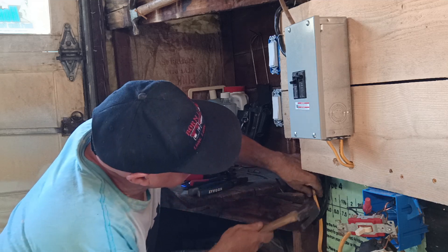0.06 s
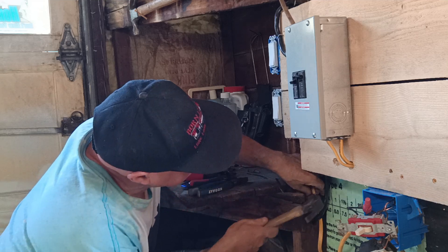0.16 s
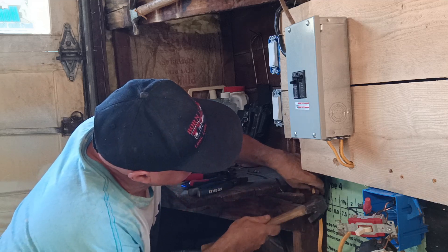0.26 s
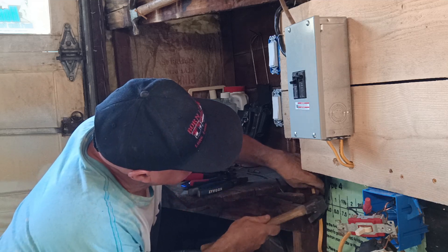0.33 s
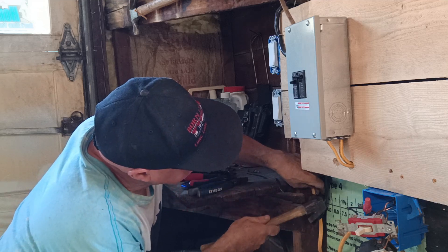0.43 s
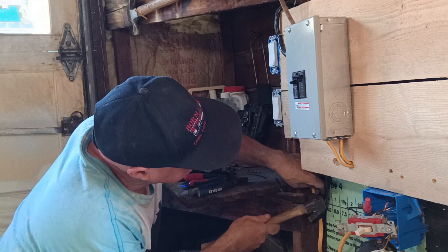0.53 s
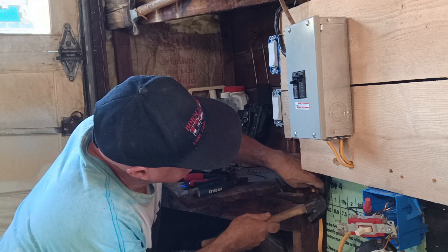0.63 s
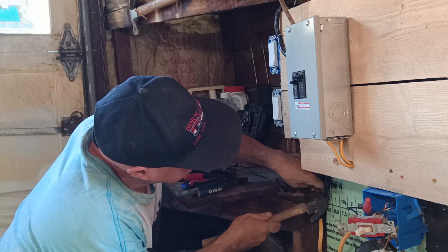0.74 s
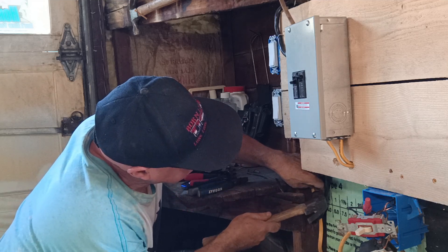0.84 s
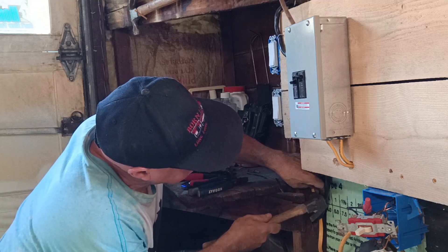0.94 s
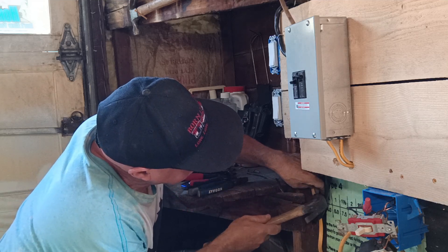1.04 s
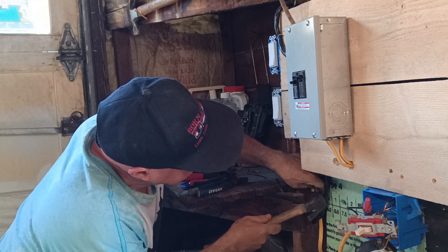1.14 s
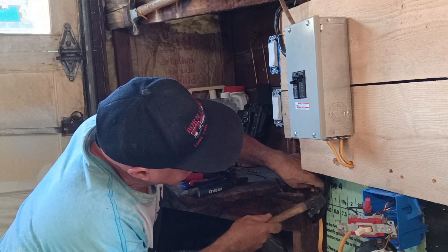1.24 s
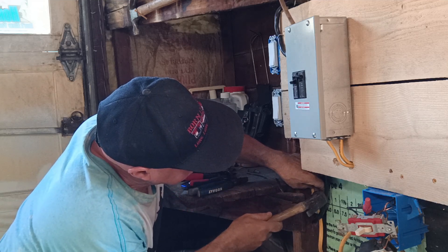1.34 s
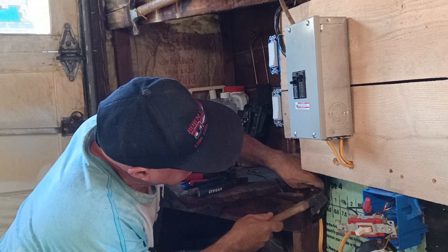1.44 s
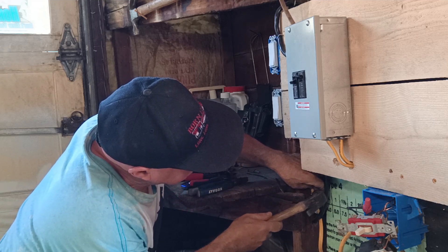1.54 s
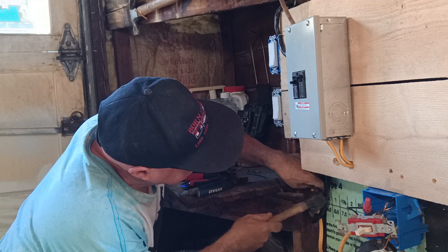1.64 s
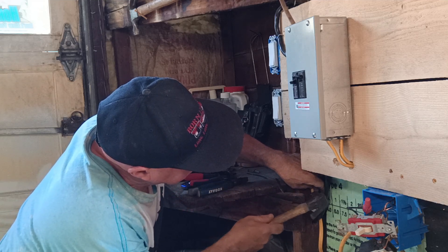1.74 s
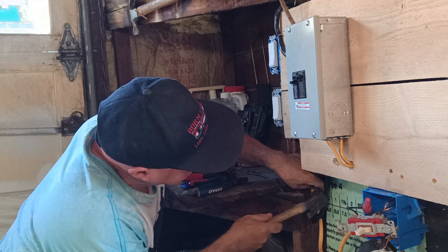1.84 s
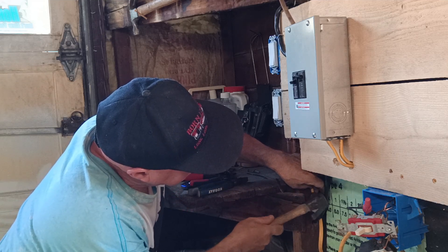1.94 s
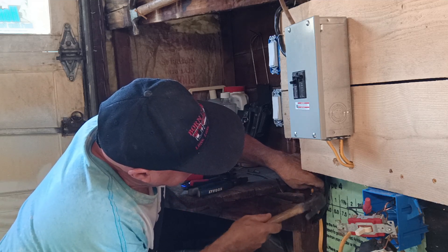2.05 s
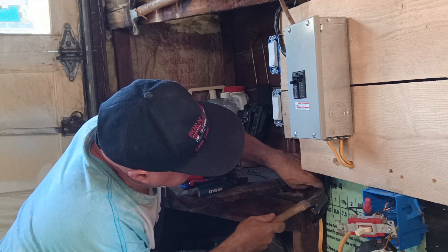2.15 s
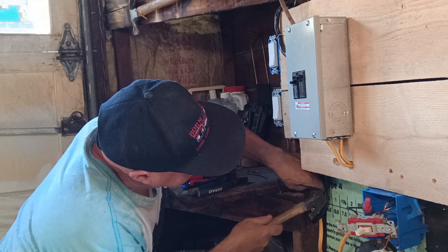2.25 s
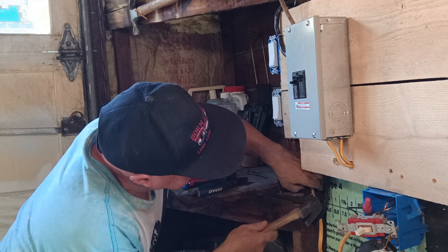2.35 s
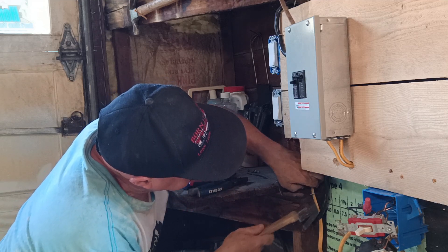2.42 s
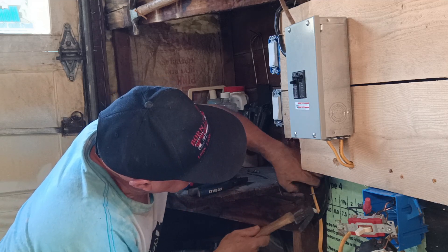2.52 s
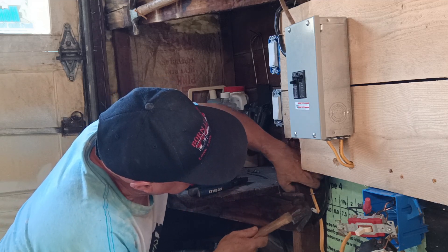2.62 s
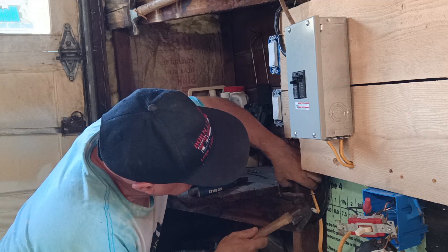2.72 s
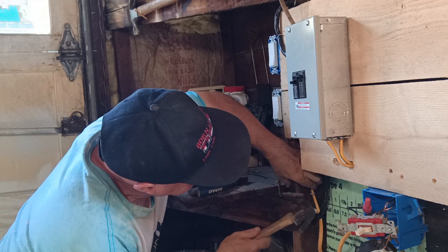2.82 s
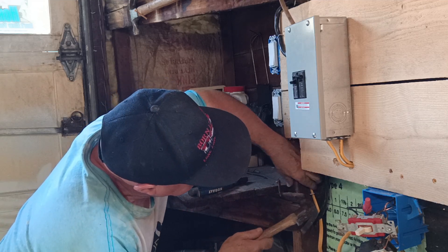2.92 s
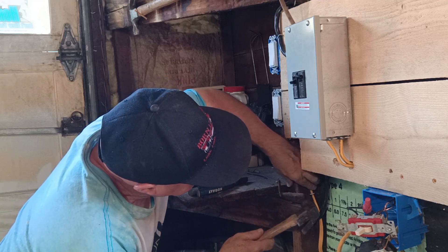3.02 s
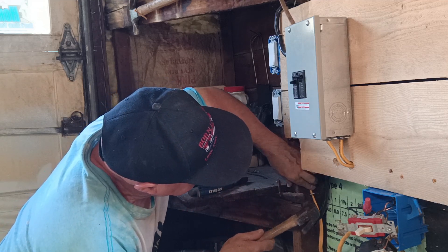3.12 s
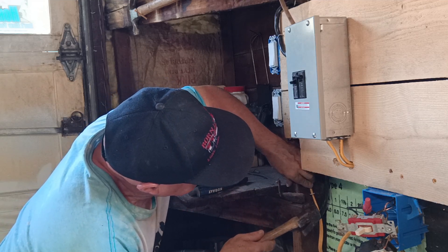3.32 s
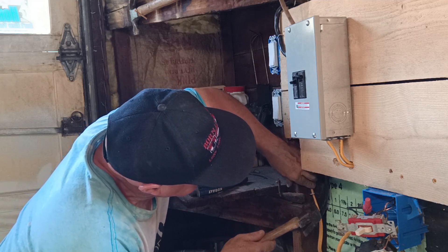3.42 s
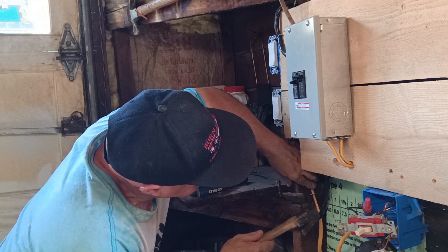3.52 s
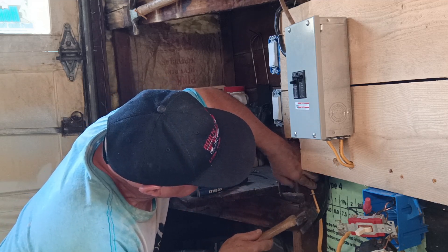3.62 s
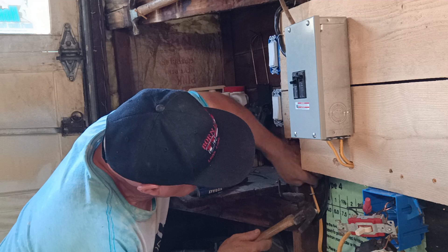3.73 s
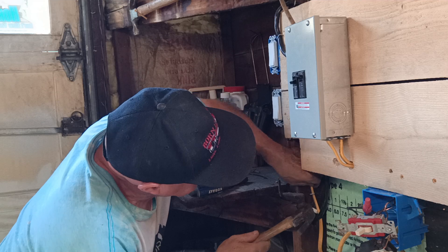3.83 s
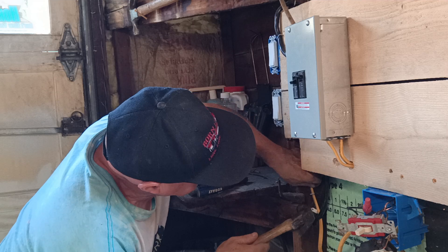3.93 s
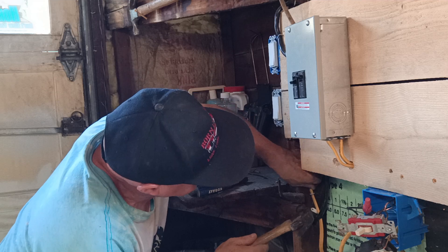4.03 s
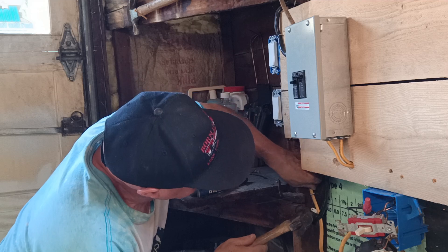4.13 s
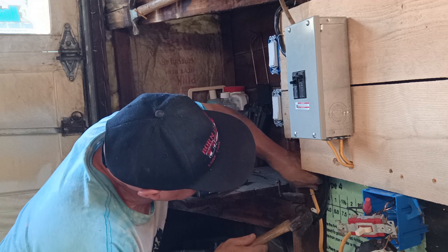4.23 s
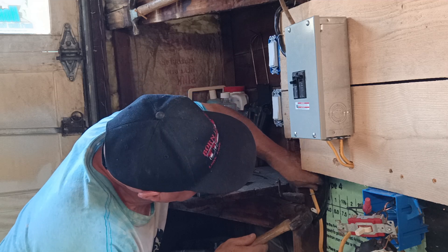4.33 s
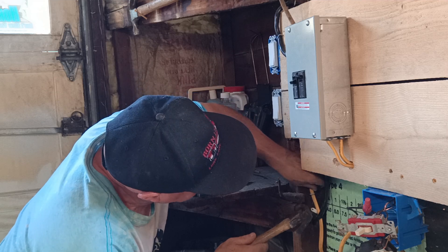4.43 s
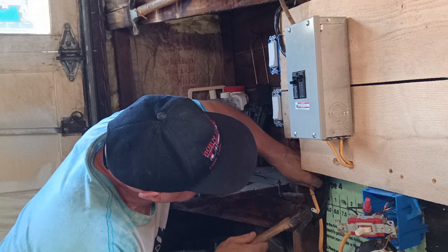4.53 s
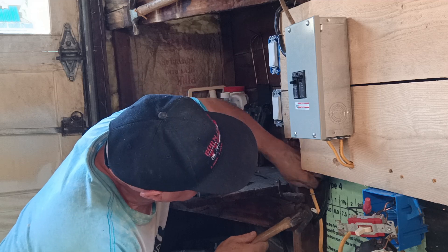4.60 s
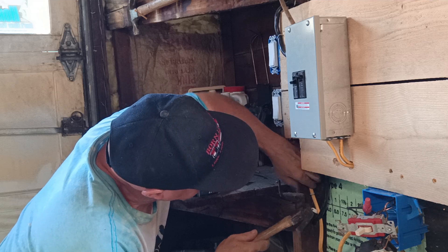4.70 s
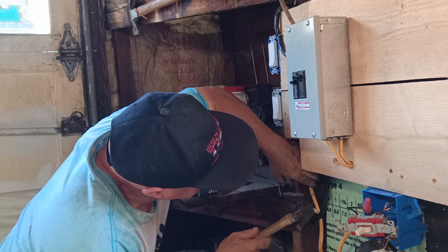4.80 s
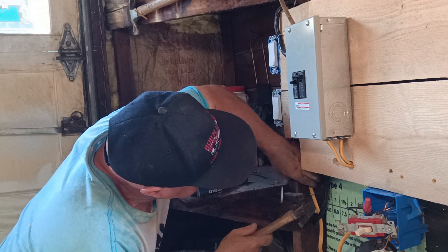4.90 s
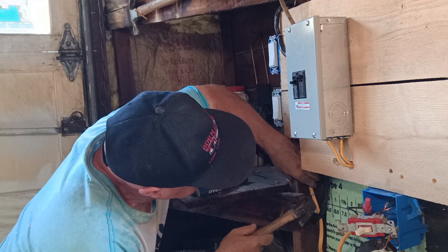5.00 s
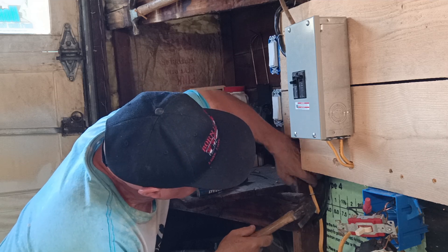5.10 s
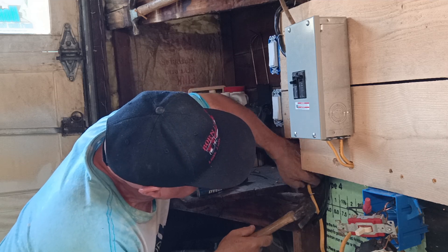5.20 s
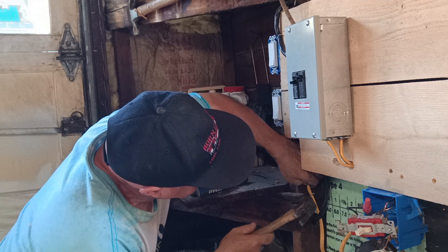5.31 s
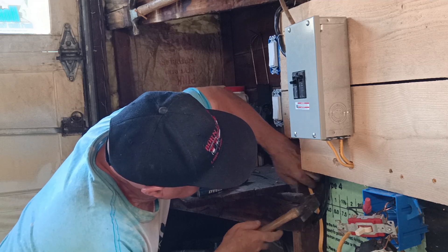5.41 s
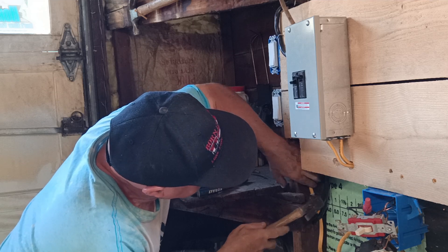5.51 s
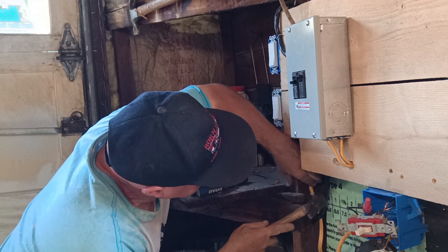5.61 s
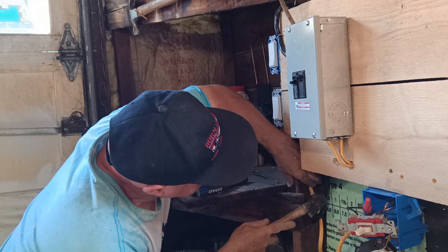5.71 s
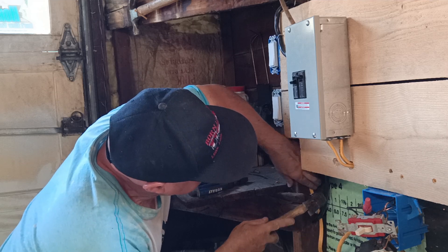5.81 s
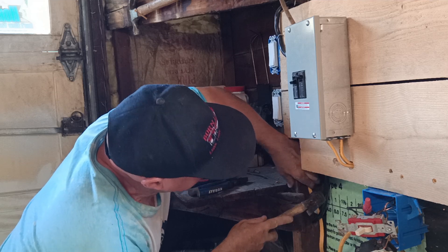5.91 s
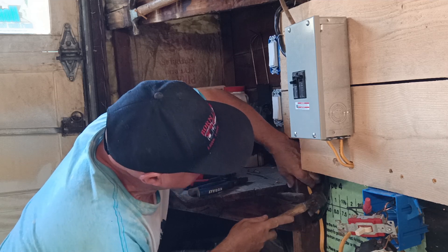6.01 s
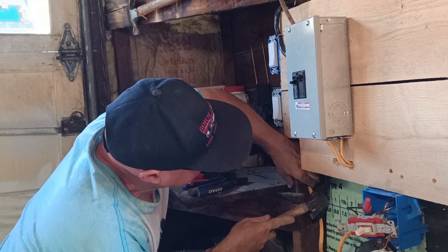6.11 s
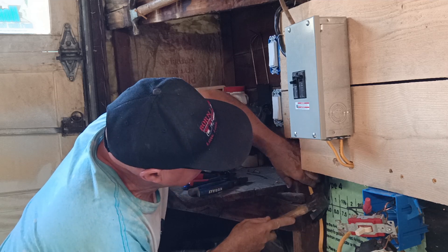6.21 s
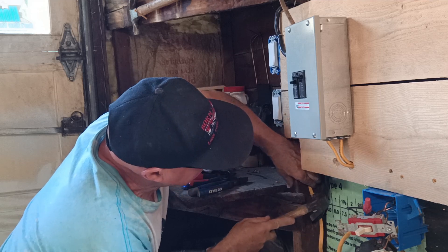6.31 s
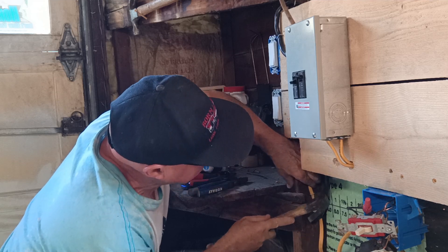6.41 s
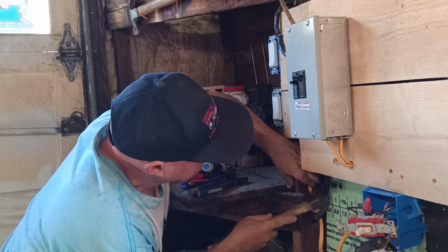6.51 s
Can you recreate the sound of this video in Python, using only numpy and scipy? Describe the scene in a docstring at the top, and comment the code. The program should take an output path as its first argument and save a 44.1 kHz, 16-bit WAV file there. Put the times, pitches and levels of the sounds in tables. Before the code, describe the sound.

Close stereo microphone in a wooden garage. Seven quick hammer strikes on a staple build from weak to loud, planks knocking and ringing briefly, the loudest ones slightly flattened. Hands then fumble quietly: dry metallic ticks, short cable drags over wood, dull sleeve rubs and lumpy low wind bumps at the right side. A single hammer blow lands at the very end, its tail cut short.

```python
"""Quiet air is heard first, then a hammer drives a cable staple into a plank wall in a wooden garage.
Seven blows, fumbling, one more blow: each is noise in bands for crack and tail, plus ringing planks.
Between them short rough contacts ring as staple and cable ticks, and uneven grains scrape over wood.
A sleeve rubs the planks as soft noise; low lumpy noise is a draught, mostly on the right microphone port."""
import sys
import numpy as np
from scipy import signal
from scipy.io import wavfile

SR = 44100
rng = np.random.default_rng(int(sys.argv[2]) if len(sys.argv) > 2 else 0)


def wav_out(sig):
    """Save sig, one row per channel (or a flat mono array), as 16-bit PCM at SR to the path in sys.argv[1]."""
    wavfile.write(sys.argv[1], SR, np.round(np.clip(np.atleast_2d(sig).T, -1, 1) * 32767).astype(np.int16))


N = 288855
TIME = np.arange(N) / SR   # s
EDGES = 25 * 2 ** np.arange(0, 9.8, 1 / 3)   # third-octave band edges, Hz
CENTRES = np.sqrt(EDGES[1:] * EDGES[:-1])   # Hz

# Levels in the tables are relative: each function and the microphone add their own gain.
# Hammer blows: start_s, boom_db, low_thud_db, thud_db, knock_db, crack_db, bite_db, sheen_db,
# first_contact_db (against the tail), tail_stretch (factor), favoured_pitch_hz, plank_thud_db, body_ring_db
HAMMER_BLOWS = [(0.693, -22.5, -32, -29.5, -37, -35.5, -31.5, -36, -1.5, 0.71, 362, -32.5, -1),
                (0.900, -23, -17.5, -23.5, -12.5, -18.5, -19, -28, 7, 0.82, 266, -19.5, 0),
                (1.179, -15, -33, -18, -15.5, -27, -22, -23, 8.5, 0.69, 306, -16, -1),
                (1.405, -8, -13.5, -15.5, -10.5, -12.5, -12.5, -8.5, 6, 0.72, 340, -13, -2.5),
                (1.637, -4, -3, -8, -6, -3, -6, -4, 3, 0.81, 390, -12.5, -4),
                (1.873, -5, -2.5, -9.5, -4.5, -2.5, -2, -6, -0.5, 0.9, 455, -12, -1.5),
                (2.084, -2.5, 3, -6.5, -1.5, 1.5, -1.5, -2.5, 1, 0.94, 470, -12.5, 0.5),
                (6.49, -7, -4.5, -0.5, -12.5, -10.5, -10.5, -0.5, -3, 0.8, 298, -4, 2.5)]
# Centres of boom, low thud, thud, knock, crack, bite and sheen: pitch_hz
PART_PITCHES = [100, 220, 350, 1100, 3000, 6500, 12000]
# Ringing planks of the wall: pitch_hz, level_db, ring_s (time to fall 60 dB, capped in blows)
WALL_MODES = [(72, -5.5, 0.4), (126.9, 2, 0.39), (202.7, 4.5, 0.046), (303.3, -7, 0.3), (348, -6.5, 0.12),
              (395, -2, 0.12), (455, -7, 0.4), (549.6, -5, 0.15), (688, -16.5, 0.3), (1048, -11.5, 0.18)]
# Colour of a blow: pitch_hz, level_db (per Hz)
STRIKE_SPECTRUM = [(40, -17), (91, -12.5), (127, -8), (178, -16.5), (230, -12.5), (330, -12), (467, -12.5),
                   (585, -15), (1290, -19), (1480, -26.5), (2330, -28.5), (6330, -28.5), (8990, -49),
                   (11500, -51.5), (14500, -55.5)]
# Planks, hammer and staple colour the tail: pitch_hz, width_hz, level_db (over the tail)
BODY_RINGS = [(900, 40, 5), (1190, 70, 8), (1310, 45, 6), (1950, 50, 9), (2240, 25, 8), (2520, 40, 6),
              (3130, 30, 4), (3450, 35, 6), (3880, 35, 5), (4170, 25, 6), (5215, 80, 4), (6160, 80, 4),
              (6465, 45, 4)]
# Garage tail: pitch_hz, fall_s (time to fall 60 dB, before each blow's stretch)
GARAGE_DECAY = [(60, 0.44), (160, 0.28), (420, 0.34), (1100, 0.28), (2900, 0.29), (6500, 0.29),
                (9000, 0.19), (12000, 0.14), (15000, 0.15)]
# How alike the two sides of the garage sound: pitch_hz, likeness (1 = same, 0 = unrelated)
GARAGE_ALIKE = [(60, .95), (170, .985), (350, .85), (700, .53), (1400, .12), (3000, 0)]
# The two ports differ in colour on the blows: pitch_hz, left_minus_right_db
SIDE_LEAN = [(60, -2), (130, 0.5), (290, 0), (640, 0.5), (1410, 2.5), (3100, -0.5), (6820, -0.5),
             (15000, 6.5)]
# Staple and cable ticks: start_s, pitch_hz, level_db, contact_ms (time to full pressure), left_minus_right_db
STAPLE_TICKS = [(2.209, 5170, -33.5, 1.8, -16), (2.318, 1870, -51.5, 6, 6), (2.645, 2280, -61.5, 1.4, -19),
                (2.647, 1500, -59.5, 1.3, -7), (2.687, 1820, -59, 4.2, 9), (2.745, 1910, -46.5, 1.5, 16),
                (2.746, 2300, -59, 1.5, 13.5), (2.752, 4180, -50, 0.78, -2), (2.891, 646, -63.5, 1.2, 0),
                (3.138, 1300, -61.5, 0.84, -6), (3.216, 668, -60, 2, -7), (3.343, 3280, -58, 1.1, -16),
                (3.371, 1360, -62.5, 1.6, -7), (3.535, 8200, -57, 0.35, -24),
                (3.536, 6480, -65.5, 0.61, -23), (3.596, 3050, -60, 0.94, -2.5), (3.635, 3000, -62, 1, -4),
                (3.765, 2940, -54, 3.3, 3.5), (3.855, 3800, -63, 0.85, -4), (3.897, 3110, -57, 2.8, -19),
                (3.931, 1240, -69, 4.6, 13), (4.160, 770, -57.5, 2.1, 15), (4.240, 2370, -56, 0.73, -10),
                (4.246, 1514, -46.5, 0.79, -6), (4.352, 4600, -65, 1.1, -6), (4.408, 2700, -56.5, 3.2, -6),
                (4.416, 2016, -60.5, 4.7, -26), (4.418, 5900, -48, 3.4, -19), (4.419, 5300, -67, 3.5, -17),
                (4.529, 2240, -59, 1, -6), (4.614, 5050, -60, 2.8, -6), (4.668, 1484, -59, 1.6, -26),
                (5.351, 1590, -60, 5.6, 6), (5.404, 6040, -40.5, .6, -20), (5.428, 6050, -54.5, 15, -4),
                (5.67, 4600, -49.5, 0.31, -5), (5.674, 2005, -54.5, 3, 15), (5.726, 4000, -58, 0.54, -13),
                (5.731, 4230, -38.5, 0.42, -26.5), (5.799, 2000, -65, 8, 8), (5.819, 1450, -58, 2.5, -16),
                (5.818, 4300, -63, 1, -18), (6.036, 1895, -55.5, 1.2, 19), (6.129, 1660, -61, 1.1, 8),
                (6.228, 4860, -57, 1, -1), (6.37, 1660, -62, 0.92, 10), (6.476, 4360, -51.5, 1.36, -2)]
# Cable dragged over wood: start_s, length_s, level_db, brightness_db
CABLE_SCRAPES = [(4.073, 0.054, -50.5, -4.5), (4.16, 0.021, -49, -2.5), (4.421, 0.0062, -57, 7),
                 (4.52, 0.025, -61, -3), (4.59, 0.011, -67.5, 8.5), (4.903, 0.024, -59, -4),
                 (5.03, 0.009, -62.5, -1.5), (5.408, 0.003, -44.5, 1)]
# Colour of the scraping grains: pitch_hz, level_db (per Hz)
SCRAPE_SPECTRUM = [(400, -14), (1000, -4), (4000, 3.5), (6000, 11), (9000, -8), (16000, -20)]
# Rings of the dragged cable: pitch_hz, width_hz, level_db
CABLE_RINGS = [(770, 10, 10), (1131, 20, 7.5), (1840, 95, -5.5), (2374, 23, -2.5), (5100, 59, -6.5),
               (3280, 22, -12), (6720, 33, -2)]
# Dull rubs of hand or sleeve on the planks: start_s, length_s, level_db, pitch_hz
SLEEVE_RUBS = [(2.3, 0.044, -49, 430), (2.465, 0.012, -57, 268), (3.14, 0.053, -70.5, 616),
               (4.31, 0.066, -70, 627), (4.638, 0.038, -63.5, 381), (5.931, 0.034, -66.5, 716),
               (6.395, 0.18, -65, 315)]
# Gusts of draught: start_s, length_s, right_db, left_db
DRAUGHT_GUSTS = [(1.086, 0.05, -56, -55), (2.43, 0.13, -64, -63), (2.978, 0.088, -42.5, -82),
                 (3.252, 0.12, -38.5, -78), (3.48, 0.045, -52.5, -57), (3.766, 0.016, -48, -59),
                 (4.275, 0.095, -48, -57), (4.445, 0.084, -39.5, -73), (4.797, 0.029, -35.5, -67),
                 (4.916, 0.17, -42.5, -60), (5.207, 0.23, -46.5, -66), (5.498, 0.061, -36.5, -43),
                 (5.635, 0.025, -51, -73), (5.822, 0.064, -47.5, -73), (6.015, 0.048, -35.5, -70),
                 (6.15, 0.019, -44.5, -57)]
# Lone puffs on the right port: start_s, peak_db (before doubling), pitch_hz
LONE_PUFFS = [(2.804, -33, 90.6), (3.229, -33.5, 108), (4.348, -28.5, 119), (4.91, -33.5, 112),
              (5.018, -29.5, 86), (5.996, -29.5, 110.4)]
# Colour of the gusts: pitch_hz, level_db (per Hz)
GUST_SPECTRUM = [(20, -76), (57, 4), (87, -3), (129, -3.5), (216, -29.5), (280, -23), (330, -81)]
# The gusts are nearly unrelated in the two ports: pitch_hz, likeness
GUST_ALIKE = [(20, 0.015), (300, 0.006)]
# Sleeve and cable rustle over time: time_s, low_rustle_db, scuff_db
RUSTLE_LEVELS = [(2.2, -46, -41.5), (2.44, -58.5, -70), (2.71, -63, -76), (2.96, -70, -83), (3.4, -69, -82),
                 (4.11, -69, -77.5), (4.3, -63.5, -70.5), (4.55, -66.5, -70.5), (4.9, -69.5, -83.5),
                 (5.27, -66, -72.5), (5.55, -70.5, -93), (5.85, -67, -73), (6.47, -71, -81.5)]
# Colour of the low rustle: pitch_hz, level_db (per Hz)
RUSTLE_SPECTRUM = [(170, 11.0), (330, 2), (800, -14.0), (2500, -36.5)]
# Colour of the room air: pitch_hz, level_db (per Hz)
AIR_SPECTRUM = [(24, -46), (40, 0), (133, -0.5), (392, -8), (516, -3), (585, -12), (1150, -12.5),
                (2840, -18), (6490, -8), (8130, -31), (11500, -32.5), (14500, -34)]
# How alike the air is on both sides: pitch_hz, likeness (below 0 = opposed)
AIR_ALIKE = [(60, 0.89), (240, 0.42), (950, 0.44), (3770, -0.18), (15000, -0.77)]
# Microphone port resonances: pitch_hz, width_hz, lift_db
PORT_RINGS = [(6810, 2000, 6.5), (15800, 1900, 14.5)]

FAVOUR_DB, FAVOUR_OCTAVES = 6.5, 0.17   # lift and half-width around a blow's favoured pitch
TOP_BEND = 0.7   # per octave above 6 kHz: the tail holds, then drops
SCRAPE_RISE_DB_S, SCRAPE_FALL_DB_S = 1300, 600
RUB_RISE_DB_S, RUB_FALL_DB_S, RUB_WIDTH = 403, 319, 0.28   # width as a share of the pitch
GUST_RISE_DB_S, GUST_FALL_DB_S = 489, 293
AIR_DB = -69
BASS_CUT_HZ, CUTOFF_HZ = 50.4, 15900
KNEE_DB, SQUEEZE, RELEASE_DB_S, ATTACK_S = -13, 0.38, 115, .001   # fast limiter
DUCK_KNEE_DB, DUCK, RECOVER_DB_S = -26, 0.075, 31.5   # slow gain control


def blows(direct_s=0.023, build_s=0.012, tail_db=16, wall_db=-12, scatter_db=3.0, longest_s=0.26,
          rattle_db=2.0, swell_width=0.36, thud_cycles=8.6, ring_t60=0.27, hold=1.08,
          snap_db_oct=3.5, build_cycles=0.21):
    """Each blow: a short crack and thud, a garage tail that builds and dies band by band, and wall modes."""
    rows = np.array(HAMMER_BLOWS)
    starts = (rows[:, 0] * SR).astype(int)
    favoured_hz = rows[:, 10]
    out = np.zeros((2, N))
    white = rng.standard_normal((2, 2, N))
    latest = np.searchsorted(starts, np.arange(N), side="right") - 1
    since = np.where(latest < 0, 9, TIME - starts[latest] / SR)   # s since the latest blow

    def strength_db(hz):
        """Level of every blow at one pitch, lifted around its favoured pitch."""
        parts_db = np.array([at_hz(np.transpose([PART_PITCHES, parts]), hz) for parts in rows[:, 1:8]])
        octaves_off = np.log2(hz / favoured_hz)
        return parts_db + FAVOUR_DB * np.exp(-.5 * (octaves_off / FAVOUR_OCTAVES) ** 2)

    def decay(t60, bend=1):
        """Fall since the latest blow, reaching -60 dB after t60 seconds."""
        return from_db(-60 * (since / t60) ** bend)

    for k, hz in enumerate(CENTRES):
        # steel on steel is sharpest at the top
        contact_db = rows[latest, 8] + snap_db_oct * max(np.log2(hz / 4000), 0)
        opening = from_db(contact_db) * decay(direct_s) - decay(build_s + build_cycles / hz)
        onset = decay(build_cycles / hz)   # low pitches take longer to start
        opening *= 1 - onset
        bend = hold + TOP_BEND * max(np.log2(hz / 6000), 0)
        tail = decay(at_hz(GARAGE_DECAY, hz) * rows[latest, 9], bend)
        gain = from_db(strength_db(hz) + at_hz(STRIKE_SPECTRUM, hz) + tail_db)[latest]
        shape = gain * (opening + tail - onset)
        shape *= from_db(rattle_db * (drift(60) + drift(18)))   # loose tools roughen the tail
        lean = sides(at_hz(SIDE_LEAN, hz))[:, None]
        out += stereo_band(k, white[k % 2] * shape, GARAGE_ALIKE) * lean

    # Noise keeps the body resonances going
    shaking = rng.standard_normal((2, N)) * (decay(ring_t60) - decay(build_s))
    for hz, width, db in BODY_RINGS:
        level_db = strength_db(hz) + at_hz(STRIKE_SPECTRUM, hz) + tail_db + db + rows[:, 12]
        out += resonance(shaking * from_db(level_db)[latest], hz, width)

    for hz, level_db, t60 in WALL_MODES:
        hits = np.zeros((2, N))
        # every blow strikes the mode a little differently
        uneven_db = scatter_db * rng.standard_normal((2, len(starts)))
        hits[:, starts] = from_db(strength_db(hz) + level_db + wall_db + uneven_db)
        rung = ring(hits * rng.choice([-1, 1], (2, 1)), hz, min(t60, longest_s))
        mid, side = resonance(rung, hz, swell_width * hz)   # swells over a few cycles
        out += spread(mid, side, hz, GARAGE_ALIKE)

    # The struck plank gives way: a few cycles at its own pitch
    for i, thud_level_db, hz in zip(starts, rows[:, 11], favoured_hz):
        t = TIME[:min(SR // 10, N - i)]
        fall = from_db(thud_level_db - 60 * t * hz / thud_cycles)
        out[:, i:i + len(t)] -= fall * np.sin(2 * np.pi * hz * t) * (1 - np.exp(-t * hz * 2))
    return out


def ticks(echo_db=-28, echo_s=0.069, width=0.11, snap_db=-46):
    """A rough contact, sharp or soft, rings briefly (width is a share of pitch), and near walls answer."""
    out, length = np.zeros((2, N)), SR // 5
    t = TIME[:length]
    answer = rng.standard_normal((2, length)) * from_db(echo_db - 30.0 * (t / echo_s) ** 1.66)
    answer[:, :SR // 200] = 0   # the first walls are a few ms away
    roughness = rng.standard_normal((len(STAPLE_TICKS), length))
    for rough, (s, hz, db, contact_ms, pan_db) in zip(roughness, STAPLE_TICKS):
        pressed = t * 1000 / contact_ms
        contact = rough * pressed * np.exp(1 - pressed)
        rung = resonance_twice(contact, hz, width * hz)
        snap = from_db(snap_db) * resonance(contact, 6000, 5900) / contact_ms
        tick = from_db(db) * (rung / rung.max() + snap)
        echo = signal.fftconvolve(answer, tick[None], axes=1)[:, :length]
        sound = tick * sides(pan_db)[:, None] + echo
        i = int(s * SR)
        out[:, i:i + length] += sound[:, :N - i]
    return out


def scrapes(ring_db=12, split_hz=4000):
    """Dense uneven grains while the cable drags, ringing in the cable; each drag has its own brightness."""
    grains = coloured(SCRAPE_SPECTRUM, AIR_ALIKE, patchy_db=3.0, grain=from_db(2.6 * drift(300)))
    rings = sum(from_db(db + ring_db + 1.4 * drift(24.45)) * resonance(grains, hz, width)
                for hz, width, db in CABLE_RINGS)
    low, high = (rms_one(butter(grains + rings, 2, split_hz, kind)) for kind in ("low", "high"))
    out = np.zeros((2, N))
    for s, length, db, bright_db in CABLE_SCRAPES:
        low_gain = np.sqrt(max(1 - from_db(2 * bright_db), .02))
        sound = low_gain * low + from_db(bright_db) * high
        out += from_db(db) * swell(s, length, SCRAPE_RISE_DB_S, SCRAPE_FALL_DB_S) * sound
    return out


def rubs():
    """Short swells of noise in one broad low resonance, alike on both sides."""
    noise = rng.standard_normal(N)
    out = np.zeros(N)
    for s, length, db, hz in SLEEVE_RUBS:
        dull = rms_one(resonance_twice(noise, hz, RUB_WIDTH * hz))
        out += from_db(db) * swell(s, length, RUB_RISE_DB_S, RUB_FALL_DB_S) * dull
    return out


def draught(cycles=0.34, edge_hz=210):
    """Lumpy low pressure, nearly unrelated in the two ports, with lone puffs of about one cycle."""
    lumpiness = from_db(5.3 * np.minimum(drift(40), 1.5))
    lumps = coloured(GUST_SPECTRUM, GUST_ALIKE, patchy_db=2.0, grain=lumpiness)
    out = lumps * sum(from_db([[left_db], [right_db]]) * swell(s, length, GUST_RISE_DB_S, GUST_FALL_DB_S)
                      for s, length, right_db, left_db in DRAUGHT_GUSTS)
    for s, peak_db, hz in LONE_PUFFS:
        turns = (TIME - s) * hz - 1   # the peak comes one cycle after the start
        out[1] += 2 * from_db(peak_db) * np.cos(2 * np.pi * turns) * np.exp(-.5 * (turns / cycles) ** 2)
    return butter(out, 4, edge_hz, "low")


def room_tone():
    """Air noise at one level, with a lumpy rustle and scuffs that swell over time."""
    time_s, low_db, scuff_db = np.transpose(RUSTLE_LEVELS)
    low_gain = from_db(np.interp(TIME, time_s, low_db, -150, -150))
    scuff_gain = from_db(np.interp(TIME, time_s, scuff_db, -150, -150))
    air = from_db(AIR_DB) * coloured(AIR_SPECTRUM, AIR_ALIKE, patchy_db=3.0)
    low = coloured(RUSTLE_SPECTRUM, AIR_ALIKE, patchy_db=4.0, grain=from_db(6.1 * drift(27)))
    return air + low_gain * low + scuff_gain * scuffs()


def scuffs(per_s=1500, cycles=49.0, spread_db=4.0):
    """Small grains in clumps, each ringing a few cycles at a pitch and side of its own; rms 1."""
    sizes = from_db(spread_db * np.minimum(rng.exponential(1, N), 4)) * rng.choice([-1, 1], N)
    born = rng.random(N) < per_s * from_db(3.0 * drift(25)) / SR
    pitches = np.geomspace(900, 7000, 16)   # Hz
    dealt = rng.integers(0, 32, N)   # one of 16 pitches on one of 2 sides
    out = np.zeros((2, N))
    for k, hz in enumerate(pitches):
        for port in (0, 1):
            grains = sizes * born * (dealt == 2 * k + port)
            out[port] += resonance(ring(grains, hz, cycles / hz), hz, hz / 4)
    return rms_one(out)


def coloured(spectrum, likeness, patchy_db, grain=1):
    """Stereo noise of a given spectrum, each band flickering on its own; rms 1."""
    white = rng.standard_normal((2, 2, N)) * grain
    low, high = spectrum[0][0], spectrum[-1][0]
    out = np.zeros((2, N))
    for k, hz in enumerate(CENTRES):
        if low / 1.2 < hz < high * 1.2:
            gain = from_db(at_hz(spectrum, hz) + patchy_db * drift(20))
            out += gain * stereo_band(k, white[k % 2], likeness)
    return rms_one(out)


def stereo_band(k, white, likeness):
    """One band of two noises, mixed to the left-right likeness of that pitch."""
    mid, side = band(k, white)
    return spread(mid, side, CENTRES[k], likeness)


def spread(mid, side, hz, likeness):
    """Two sides from a shared and an opposed signal: more shared signal makes them more alike."""
    alike = np.clip(at_hz(likeness, hz), -.99, .99)
    return np.sqrt(1 + alike) * mid + np.sqrt(1 - alike) * side * [[1], [-1]]


def band(k, x):
    """One third-octave band, with steeper skirts between 4 and 8.5 kHz."""
    order = 4 if 4000 < EDGES[k] < 8500 else 2
    return butter(x, order, EDGES[k:k + 2], "band")


def butter(x, order, hz, kind):
    """A smooth filter that passes the low, high or band part."""
    return signal.sosfilt(signal.butter(order, hz, kind, fs=SR, output="sos"), x)


def resonance(x, hz, width):
    """A body that favours one pitch, with gain 1 on top; width in Hz."""
    r = np.exp(-np.pi * width / SR)
    back = [1, -2 * r * np.cos(2 * np.pi * hz / SR), r * r]
    return signal.lfilter([(1 - r * r) / 2, 0, (r * r - 1) / 2], back, x)


def resonance_twice(x, hz, width):
    """Two equal resonances in series: steeper skirts."""
    return resonance(resonance(x, hz, width), hz, width)


def ring(clicks, hz, t60):
    """A unit click sets off a sine that starts near height 1 and falls 60 dB in t60 seconds."""
    r, w = from_db(-60 / (t60 * SR)), 2 * np.pi * hz / SR
    return signal.lfilter([0, np.sin(w)], [1, -2 * r * np.cos(w), r * r], clicks + 1e-18)


def swell(start, length, rise_db_s, fall_db_s):
    """Gain that rises to 1 at the start, holds, then falls."""
    rise_db = rise_db_s * (TIME - start)
    fall_db = fall_db_s * (start + length - TIME)
    return from_db(np.minimum(0, np.minimum(rise_db, fall_db)))


def drift(rate):
    """Slow random wandering through points of spread 1, rate points a second."""
    steps = rng.standard_normal(int(N / SR * rate) + 2)
    return np.interp(TIME * rate, np.arange(len(steps)), steps)


def held(over_db, fall_db_s):
    """Follows a rise at once and falls at a steady rate."""
    return np.maximum.accumulate(over_db + fall_db_s * TIME) - fall_db_s * TIME


def from_db(db):
    """Decibels to a plain gain."""
    return 10 ** (np.asarray(db) / 20)


def rms_one(x):
    """Scales a sound to an average strength (rms) of 1."""
    return x / np.sqrt(np.mean(x ** 2) + 1e-20)


def at_hz(points, hz):
    """Reads a table at a pitch, evenly by octave between its points."""
    table = np.array(points)
    return np.interp(np.log(hz), np.log(table[:, 0]), table[:, 1])


def sides(pan_db):
    """Left and right gains for a left-minus-right level."""
    return from_db(np.multiply.outer([.5, -.5], pan_db))


def scene():
    """Hammer, ticks, scrapes and rubs over draught and room tone."""
    return blows() + ticks() + scrapes() + rubs() + draught() + room_tone()


def record(dry):
    """Port colour; a fast limiter flattens loud blows, a slow gain control ducks what follows; ends cut."""
    x = dry + sum((from_db(db) - 1) * resonance_twice(dry, hz, width) for hz, width, db in PORT_RINGS)
    x = butter(x, 3, BASS_CUT_HZ, "high")
    level_db = 20 * np.log10(np.abs(x).max(0) + 1e-9)   # the louder side steers both
    limit_db = SQUEEZE * held(np.maximum(level_db - KNEE_DB, 0), RELEASE_DB_S)
    duck_db = DUCK * held(np.maximum(level_db - DUCK_KNEE_DB, 0), RECOVER_DB_S)
    r = np.exp(-1 / (ATTACK_S * SR))
    cut_db = signal.lfilter([1 - r], [1, -r], limit_db + duck_db)
    x = x * from_db(-np.interp(TIME + 2 * ATTACK_S, TIME, cut_db))   # looks ahead
    return signal.sosfilt(signal.ellip(16, .5, 120, CUTOFF_HZ, fs=SR, output="sos"), x)


dry = scene()
out = record(dry)
wav_out(out)
```